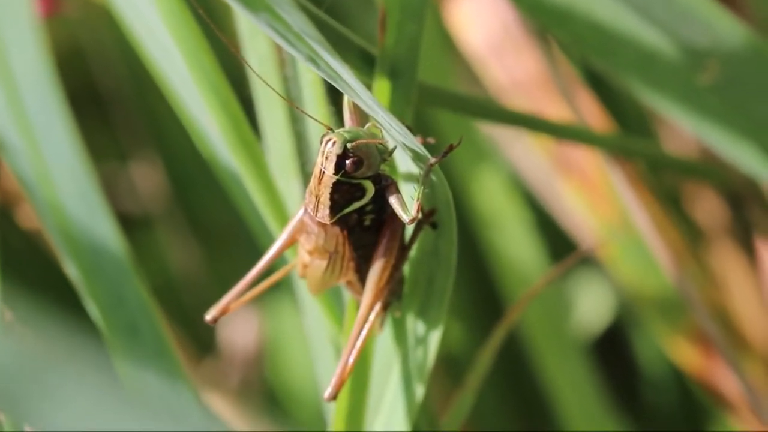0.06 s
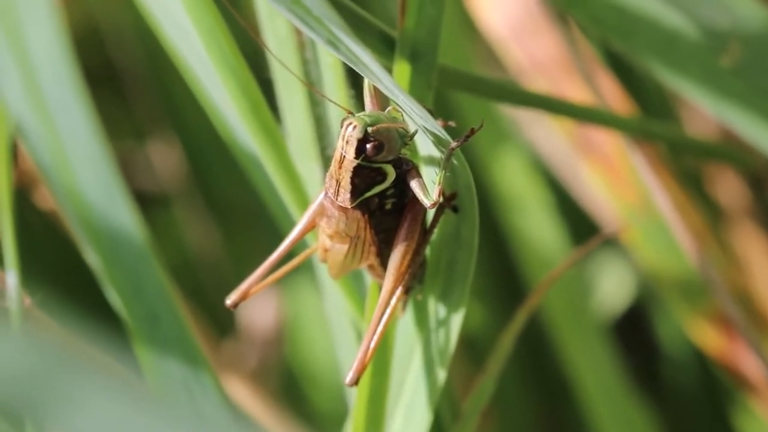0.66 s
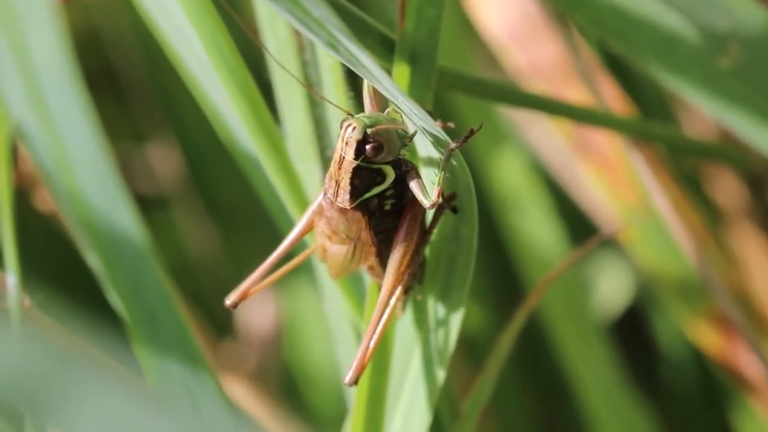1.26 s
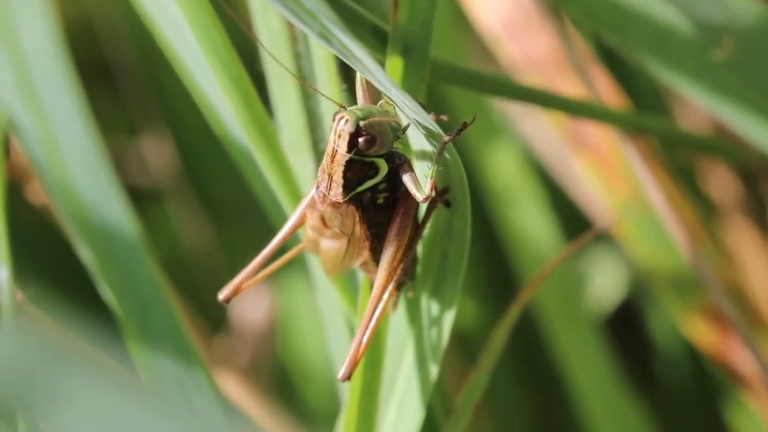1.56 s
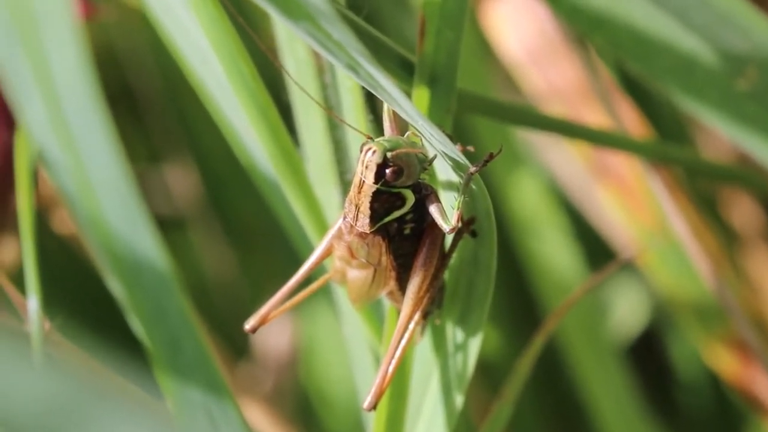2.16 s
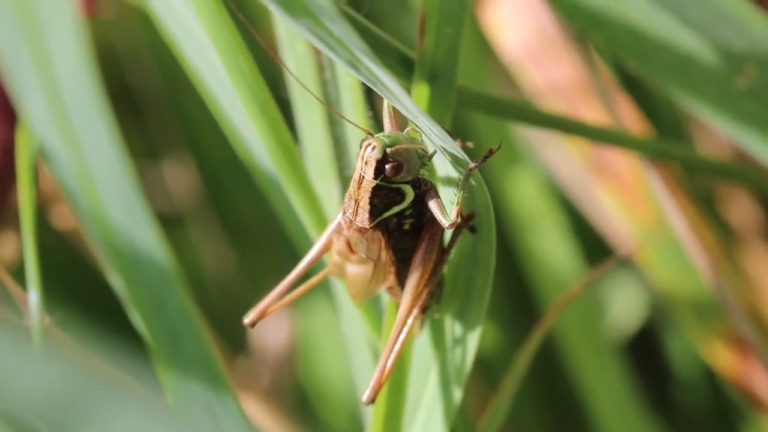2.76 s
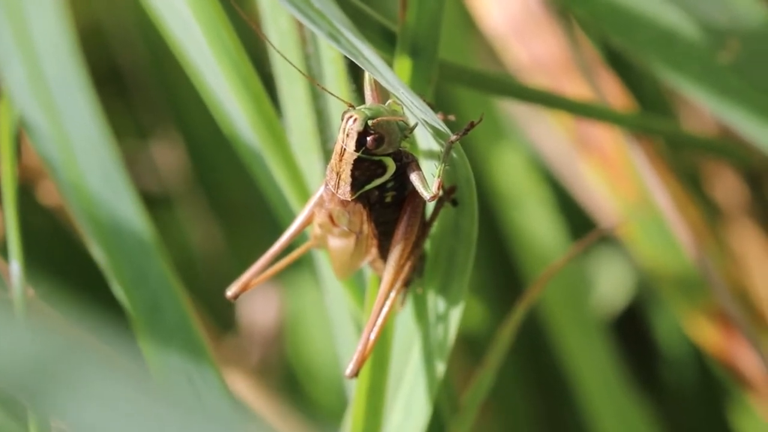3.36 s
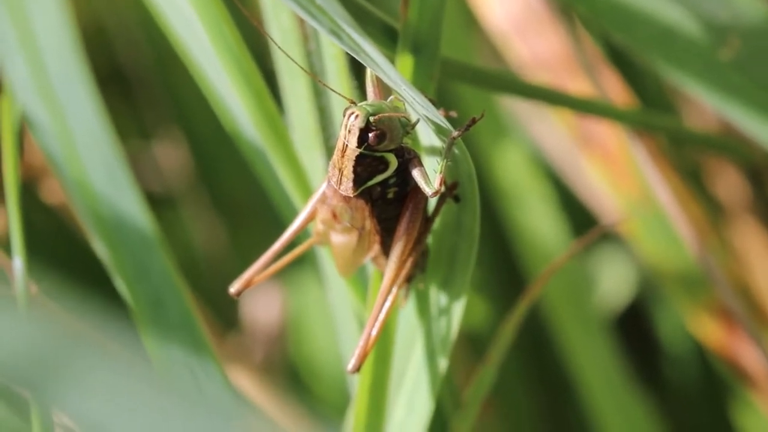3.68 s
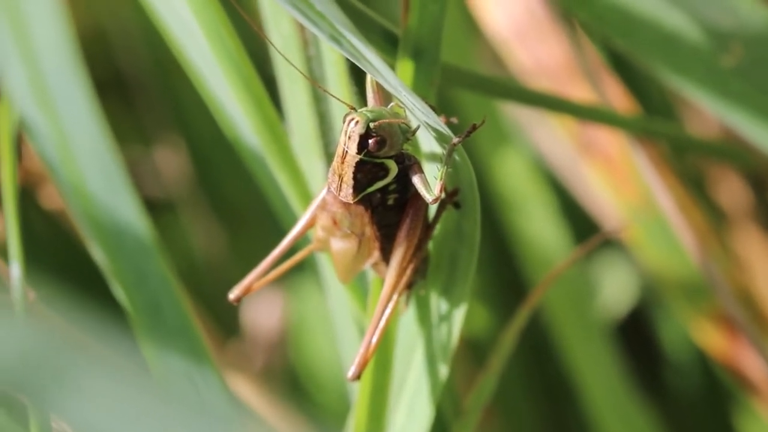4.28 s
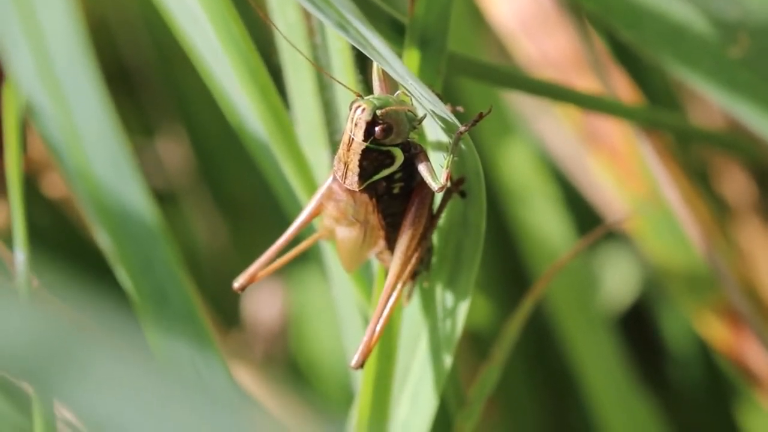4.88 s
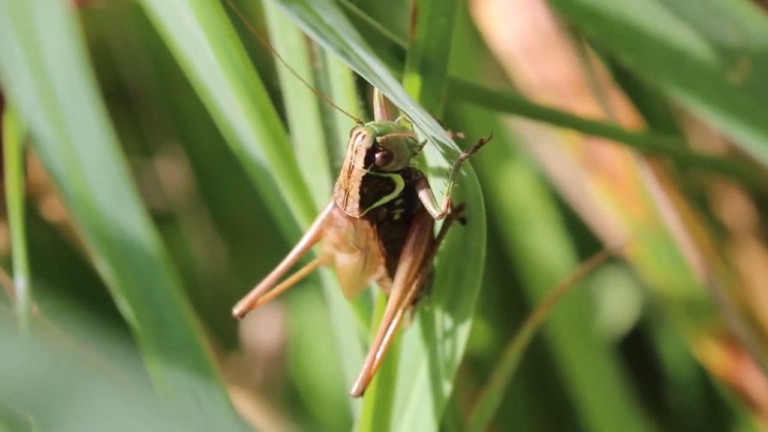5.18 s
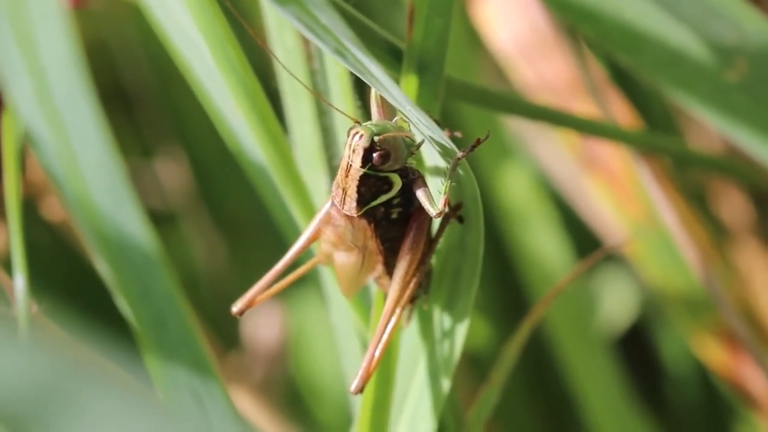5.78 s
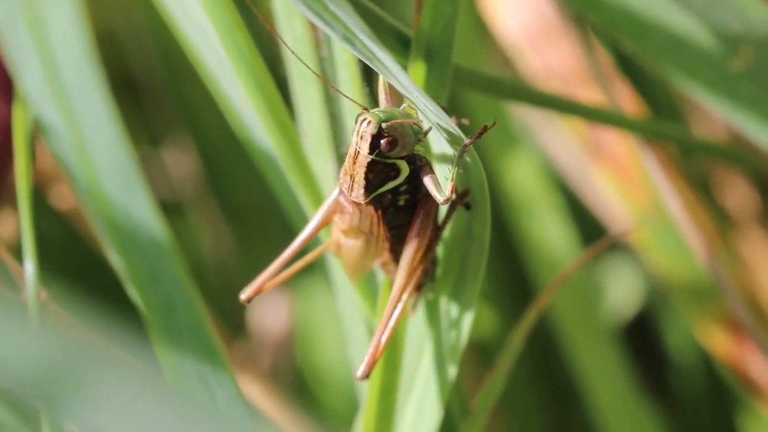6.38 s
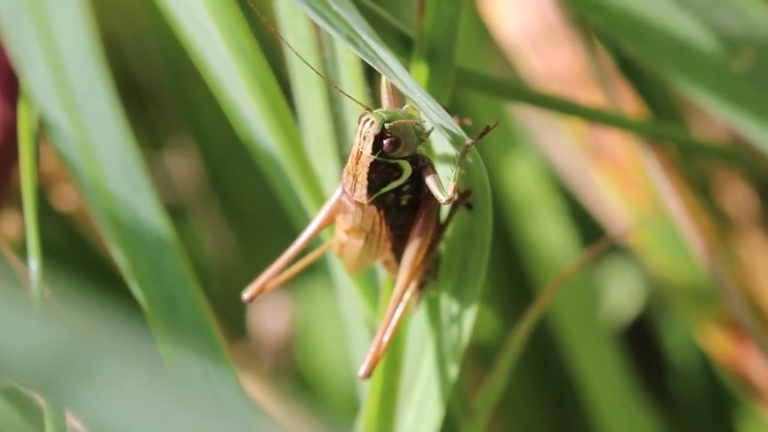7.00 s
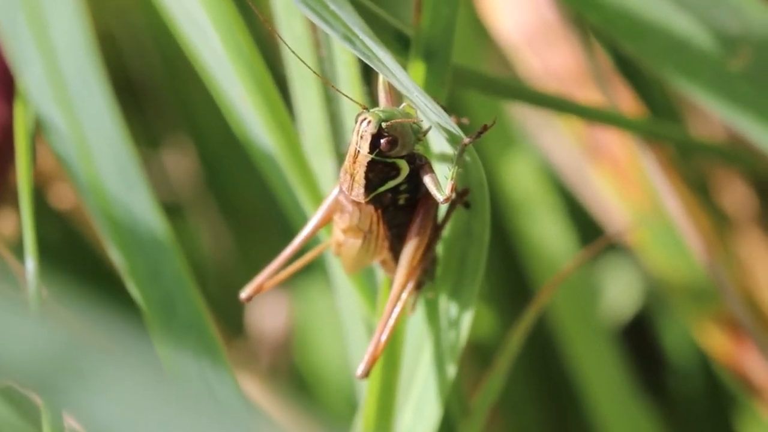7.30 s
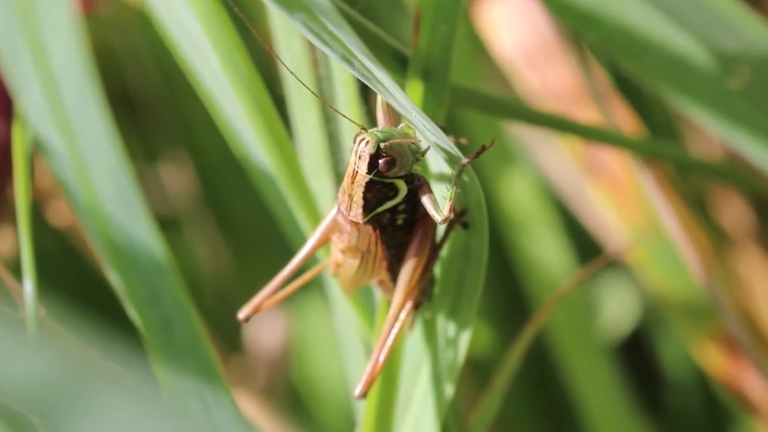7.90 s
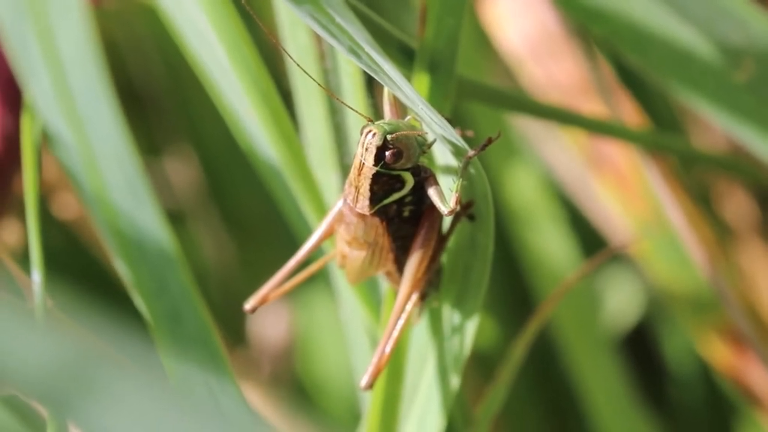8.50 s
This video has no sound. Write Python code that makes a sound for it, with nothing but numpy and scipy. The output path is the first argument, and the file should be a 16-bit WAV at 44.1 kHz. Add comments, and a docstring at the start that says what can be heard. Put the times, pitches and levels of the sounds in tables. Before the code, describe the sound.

A bush cricket buzzes continuously with a high, hissing trill, over faint wind, distant bird chirps and a far engine drone.

```python
"""In a meadow, a bush cricket sings without pause on a grass blade, close by and to the right.
Its wings close about ninety times a second. Each closing drags a row of tiny teeth (the file)
over a scraper, and the wing rings near 15 kHz. The grass scatters the song into a hiss.
Farther off are light wind, a droning engine, chirping birds and a twittering flock.
Twice, dry blades of grass touch with a faint tick."""
import sys
import numpy as np
from scipy import signal
from scipy.fft import rfft, irfft, next_fast_len
from scipy.io import wavfile
from scipy.ndimage import uniform_filter1d, map_coordinates

SR = 44100
rng = np.random.default_rng(int(sys.argv[2]) if len(sys.argv) > 2 else 0)


def output_pcm(signal):
    """Save a mono or channel-first signal as 16-bit PCM at the path in sys.argv[1].

    Samples are clipped to [-1, 1] before scaling.
    """
    pcm = np.clip(np.atleast_2d(signal).T, -1, 1) * 32767
    wavfile.write(sys.argv[1], SR, np.round(pcm).astype(np.int16))


N = 381465
TIME = np.arange(N) / SR

# Levels in the tables are relative: each sound's function sets how loud it ends up.
# the pace of the wings, sinking slightly: time_s, strokes_per_s
WING_PACE = [(0, 90.52), (.3, 90.99), (.6, 90.72), (1.7, 90.61), (2.3, 90.3), (2.6, 90.66), (3, 90.3),
             (3.6, 90.55), (4.2, 90.34), (4.8, 90.23), (5.3, 89.99), (6.2, 90.05), (7.1, 89.95),
             (7.5, 89.84), (8.65, 89.79)]
# how hard the cricket sings: time_s, effort_db
SONG_EFFORT = [(0.0, -29), (0.19, -27), (0.21, -31), (0.24, -29.5), (0.72, -28.5), (0.84, -31),
               (0.86, -28.5), (0.94, -29), (1.06, -27), (1.56, -28), (1.64, -28), (2.55, -29), (3.68, -29),
               (3.73, -29), (3.9, -27), (3.93, -28), (4.04, -29.5), (4.12, -29.5), (4.19, -27), (4.36, -30),
               (4.41, -27), (4.46, -29), (5.2, -27.5), (5.25, -30), (7.47, -29), (7.88, -28), (8.09, -31),
               (8.12, -28.5), (8.53, -28.5), (8.63, -25.5), (8.65, -28)]
# a long, a short and a slipped stroke: delay_ms, attack_ms, hold_ms, release_ms, tooth_hz, level_db
STROKE_KINDS = [(-.76, .3, .54, .68, 15340, 0), (-.5, .44, .26, .45, 14800, .5),
                (.95, .35, .2, .4, 14250, -4)]
# moments when the file slips and barely catches: time_s
SLIP_TIMES = [.203, .224, .818, 2.431, 3.238, 3.371, 6.986, 7.142, 7.153, 8.055]
# light scrapes as the wings open, and faint repeats shortly after each stroke, as if thrown back by nearby
# leaves: time_from_bite_ms, half_length_ms, level_db
STROKE_LUMPS = [(-3.5, .25, -25), (-1.5, .17, -16.5), (-1, .16, -16), (1.65, .25, -22), (2.5, 0.47, -26)]
# how well the thin wing gives off each pitch: pitch_hz, gain_db
WING_TONE = [(2000, -42), (5000, -24), (7000, -18), (8500, -8.5), (9200, -12), (9700, 1.5), (10400, 0.5),
             (12150, 6), (12550, 1), (13050, 9.5), (13850, 5), (14300, 0.5), (15450, 2.5), (15900, 4)]
# how much the left side is shaded from the cricket: pitch_hz, gain_db
LEFT_SHADE = [(5000, -2), (8500, -5), (10000, -9), (12000, -12), (13400, -15.5), (14200, -14),
              (14800, -12.5), (15300, -14.5)]
# the song as it comes back from the grass, left and right: pitch_hz, level_db
GRASS_TONE_LEFT = [(3000, -64), (5500, -56), (7000, -17.5), (8200, -14.5), (8550, -2.5), (9000, -19),
                   (9800, -6), (10400, -7.5), (12400, -11), (14000, -16), (14600, -6), (15400, -9),
                   (16000, -4.5)]
GRASS_TONE_RIGHT = [(3000, -55), (5500, -35), (7000, -20.5), (8500, -13), (9200, -5.5), (9750, -2.5),
                    (10500, -5.5), (12100, 0.5), (12600, -13), (13100, 5.5), (13800, -1), (15300, 5.5),
                    (16000, -16)]
# the top of the hiss flares up on the left: middle_s, half_length_s, level_db
HISS_FLARES = [(0.142, .07, -8), (6.35, 0.042, -4)]
# the hiss swells or sinks briefly: middle_s, lift_db
HISS_SWELLS = [(.14, 2), (.45, -1), (1.6, 0.5), (1.92, -4), (2.55, 1.5), (2.76, 2.8), (4.5, 2.2),
               (5.02, 1.5), (5.32, 2.5), (5.9, -2.5), (6.15, -3), (6.7, 1.5), (6.87, 1.5), (7.15, 2),
               (7.8, -1.5), (8.35, -1.5), (8.56, 2)]
# the tone of the open air: pitch_hz, level_db
WIND_TONE = [(20, -15), (35, -4), (58, 1), (85, 0), (125, -5.5), (250, -8), (450, -11), (700, -15),
             (1100, -16), (2000, -22), (3000, -20.5), (4000, -19.5), (5000, -24.5), (9000, -20)]
# gusts of the breeze: middle_s, half_length_s, lift_db
WIND_GUSTS = [(1.15, 0.4, 0.7), (2, 0.42, 1), (2.755, 0.053, 2.5), (4.2, 0.88, 0.86), (6.95, 0.32, 1.5),
              (8.4, 0.86, 0.8)]
# the tones that make up the drone: multiple_of_cycle_rate, level_db
ENGINE_HARMONICS = [(4, 2), (6, 1), (7, -18), (8, 4.5), (9, 0.5), (10, 6.5), (11, -5.5), (12, .5), (13, -2),
                    (14, -4), (15, -10.5), (16, -4.5), (18, -5), (20, -6)]
# the air carries one band of the drone: middle_s, half_length_s, pitch_hz, lift_db
ENGINE_SWELLS = [(1.6, 0.45, 269, 7), (2.65, 0.95, 278, 5.5), (2.75, 0.31, 240, 3), (2.85, 0.94, 188, 8),
                 (4.4, 0.92, 247, 3), (4.9, 1.05, 201, 8), (5.9, 0.83, 392, 10.5), (6.5, 1.1, 167, 12),
                 (6.955, 0.5, 416, 16), (7.297, .36, 322, 17), (7.498, 0.25, 250.5, 14),
                 (8.264, 0.48, 258, 14)]
# the nearest bird's rising chirps: start_s, length_s, from_hz, to_hz, level_db
BIRD_CHIRPS = [(.432, 0.049, 2430, 3000, -62), (1.148, 0.052, 2400, 3000, -56),
               (1.746, 0.053, 2316, 3020, -53.5), (2.461, 0.053, 2640, 3100, -63),
               (3.332, 0.061, 2260, 3000, -56.5), (3.897, 0.048, 2460, 3030, -56),
               (4.055, 0.042, 2280, 2830, -62), (4.533, 0.053, 2500, 3050, -54),
               (5.155, .05, 2490, 2990, -62), (5.586, .05, 2400, 3000, -60), (7.045, 0.03, 2890, 3350, -54),
               (7.499, 0.062, 2610, 3120, -64), (8.401, .05, 2250, 2970, -59)]
# clearer whistles of other birds: start_s, length_s, from_hz, to_hz, level_db
BIRD_WHISTLES = [(3.74, 0.042, 2720, 2680, -62), (3.8, 0.044, 2680, 2710, -57.5),
                 (3.975, 0.037, 2380, 2330, -57.5), (4.245, .035, 2700, 2710, -67.5),
                 (4.95, 0.046, 3830, 3760, -63), (5.044, .055, 3420, 2700, -63),
                 (6.755, 0.055, 3080, 3130, -63), (6.78, .03, 3350, 3480, -60),
                 (6.87, .06, 3000, 3280, -60.5)]
# bouts of twitter from the far flock: start_s, length_s, middle_hz, level_db
FLOCK_BOUTS = [(1.936, 0.3, 3420, -62.5), (2.458, 0.091, 3750, -62.5), (5.171, 0.23, 3550, -62),
               (5.6, 0.13, 3000, -62), (6.202, 0.32, 3260, -60.5), (6.722, 0.33, 3200, -63.5),
               (7.042, .28, 3346, -57.5), (7.348, 0.23, 2950, -62.5), (8.306, 0.17, 3500, -66)]
# dry ticks in the grass: start_s, level_db
GRASS_TICKS = [(5.618, -47), (7.695, -49)]


def undb(db):
    """Turn decibels into a number to multiply by."""
    return 10 ** (np.asarray(db) / 20)


def unit(x):
    """Scale a signal to an average strength (rms) of one."""
    return x / np.sqrt(np.mean(x ** 2))


def bell(x, centre, half_width):
    """A smooth hump of height one."""
    return np.exp(-((x - centre) / half_width) ** 2)


def curve(points):
    """Join rows of time_s, value with straight lines."""
    return np.interp(TIME, *np.transpose(points))


def wander(turns_per_s):
    """A smooth random drift, mostly between -1 and 1."""
    steps = rng.standard_normal(8192)
    return map_coordinates(steps, [TIME * turns_per_s], order=2, mode="mirror")


def gain_at(tone, hz):
    """Look up the gain at each pitch in rows of pitch_hz, level_db."""
    pitches, db = np.transpose(tone)
    return undb(np.interp(np.log(hz + 1), np.log(pitches), db))


def shape(x, gain):
    """Filter a signal: multiply each pitch in it by gain(hz)."""
    size = next_fast_len(N + 4096)
    return irfft(rfft(x, size) * gain(np.fft.rfftfreq(size, 1 / SR)), size)[..., :N]


def colour(x, tone):
    """Filter a signal by rows of pitch_hz, level_db."""
    return shape(x, lambda f: gain_at(tone, f))


def noise_band(hz, width_hz, channels=1):
    """Noise around one pitch, unrelated in each channel."""
    noise = rng.standard_normal((channels, N))
    return unit(shape(noise, lambda f: np.exp(-2 * ((f - hz) / width_hz) ** 2)))


def stroke_force(ms, attack_ms, hold_ms, release_ms, brush_db=-25, brush_half_ms=3.2):
    """The file bites at ms = 0, holds and lets go; light scrapes lead in, faint repeats follow as from nearby
    leaves, and a light brush surrounds it."""
    bite = np.sin(np.pi / 2 * np.clip(ms / attack_ms, 0, 1)) ** 2
    release = np.exp(-(np.maximum(ms - attack_ms - hold_ms, 0) / release_ms) ** 1.5)
    scrapes = sum(undb(db) * bell(ms, at, half_ms) for at, half_ms, db in STROKE_LUMPS)
    return bite * release + scrapes + undb(brush_db) * bell(ms, 0, brush_half_ms)


def wings(first_stroke_s=.00265, jitter_ms=.17, detune_hz=35, waver_hz=130, rasp_db=-12.5):
    """Each stroke plucks the wing tooth by tooth: by chance long and high, or short and lower."""
    pace, effort_db = curve(WING_PACE), curve(SONG_EFFORT)
    cycle = np.cumsum(pace) / SR - first_stroke_s * pace[0]
    stroke = np.round(cycle).astype(int)  # which stroke each sample belongs to
    late, luck, hard, sharp, grit_db = rng.standard_normal((1024, 5)).T  # one draw per stroke
    effort = np.interp(np.arange(len(luck)), cycle, effort_db - effort_db.mean())
    luck = luck - .25 * np.roll(luck, 1)  # a long stroke makes a short one likelier next
    long, short, slipped = range(3)
    kind = np.where(luck + .7 * effort > .05, long, short)  # effort favours long strokes
    kind[stroke[np.searchsorted(TIME, SLIP_TIMES)]] = slipped
    delay_ms, attack_ms, hold_ms, release_ms, tooth_hz, db = np.array(STROKE_KINDS)[kind[stroke]].T
    ms_from_bite = (cycle - stroke) / pace * 1000 - delay_ms - jitter_ms * late[stroke]
    force = stroke_force(ms_from_bite, attack_ms, hold_ms, release_ms)
    tooth_hz = tooth_hz * np.maximum(force, .02) ** .018  # teeth pass faster under more force
    tooth_hz = tooth_hz + detune_hz * sharp[stroke] + waver_hz * noise_band(0, 2920)[0]
    force = force * undb(db + (.3 * hard + .26 * effort)[stroke])  # effort also presses harder
    ring = force * np.sin(2 * np.pi * np.cumsum(tooth_hz) / SR)
    # uneven teeth add a broad rasp
    rasp = force ** .69 * undb(grit_db)[stroke] * rng.standard_normal(N)
    return unit(colour(unit(ring) + undb(rasp_db) * unit(rasp), WING_TONE))


def shaded_left(song, lag_s=9e-6, leaf_s=.001315, leaf_db=-8):
    """The song reaches the left side shaded and a little late, and a leaf throws it back there."""
    def gain(hz):
        lag = np.exp(-2j * np.pi * hz * lag_s)
        leaf_echo = undb(leaf_db) * np.exp(-2j * np.pi * hz * leaf_s)
        return gain_at(LEFT_SHADE, hz) * lag * (1 + leaf_echo)
    return shape(song, gain)


def grass_hiss(left_db=-12, right_db=-7.2, flutter_db=1.61, sway_db=.52):
    """Moving grass scatters the song into a fluttering hiss, made here from noise."""
    left = undb(left_db) * unit(colour(rng.standard_normal(N), GRASS_TONE_LEFT))
    flares = sum(undb(db) * bell(TIME, at, half_s) for at, half_s, db in HISS_FLARES)
    left = left + flares * noise_band(hz=15000, width_hz=900)[0]
    right = undb(right_db) * unit(colour(rng.standard_normal(N), GRASS_TONE_RIGHT))
    swell_db = sum(db * bell(TIME, at, half_width=.06) for at, db in HISS_SWELLS)
    return np.array([left, right]) * undb(swell_db + flutter_db * wander(55) + sway_db * wander(8))


def cricket(gain_db=-28.5, direct_db=5.4):
    """The song straight from the wings, louder on the right, plus its hiss from the grass."""
    direct = undb(direct_db) * wings()
    return undb(gain_db) * (np.array([shaded_left(direct), direct]) + grass_hiss())


def outdoor_noise(apart_hz=1040, least_side=.32):
    """Noise whose bass is much alike left and right, and whose treble is unrelated."""
    mid, side = rng.standard_normal((2, N))
    side = shape(side, lambda f: np.minimum(np.hypot(least_side, f / apart_hz), 1))
    return np.array([mid + side, mid - side])


def wind(rumble_db=-50.5, rustle_db=-51, split_hz=130, gust_db=1.6, sway_db=.55, flicker_db=1.7):
    """Light wind: an uneven rumble under a soft rustle. Apart from the wind, narrow bands of the treble flicker
    on their own."""
    noise = colour(outdoor_noise(), WIND_TONE)
    bass = shape(noise, lambda f: 1 / (1 + (f / split_hz) ** 4))
    breeze_db = sum(db * bell(TIME, at, half_s) for at, half_s, db in WIND_GUSTS)
    rumble = bass * undb(rumble_db + breeze_db + gust_db * wander(7.4))
    cells = signal.stft(noise - bass, nperseg=1024)[2]  # the rest, as a grid of pitch by time
    flicker = rng.standard_normal(cells.shape[1:])
    flicker = uniform_filter1d(flicker, size=5, axis=0)  # smooth across pitch
    flicker = unit(uniform_filter1d(flicker, size=4, axis=1))  # and across time
    treble = signal.istft(cells * undb(flicker_db * flicker))[1][:, :N]
    rustle = treble * undb(rustle_db + breeze_db + sway_db * wander(21))
    return (rumble + rustle) / np.std(noise)


def engine(cycle_hz=24.07, drift=.001404, gain_db=-71, fade_db_per_s=1.77, fade_from_s=2.93):
    """A far engine at steady speed; moving air favours now one band of its drone, now another."""
    waver_db, side_db, swell_octaves = 1.0, -4, .2
    level_db = gain_db - fade_db_per_s * np.abs(TIME - fade_from_s)  # quieter before and after
    swells = [(hz, db * bell(TIME, at, half_s)) for at, half_s, hz, db in ENGINE_SWELLS]
    cycle_phase = 2 * np.pi * np.cumsum(cycle_hz * (1 + drift * wander(3.04))) / SR
    mid = side = 0
    for multiple, db in ENGINE_HARMONICS:
        pitch_hz = multiple * cycle_hz
        lift_db = sum(lift * bell(np.log2(pitch_hz / hz), 0, swell_octaves) for hz, lift in swells)
        strength = np.sqrt(2) * undb(level_db + db + lift_db + waver_db * wander(1.874))
        phase = multiple * cycle_phase + .5 * wander(7)
        mid = mid + strength * np.sin(phase + rng.uniform(0, 2 * np.pi))
        # adding TIME to the phase moves each tone slowly between left and right
        side = side + strength * undb(side_db) * np.sin(phase + rng.uniform(0, 2 * np.pi) + TIME)
    return np.array([mid + side, mid - side])


def bird_notes(rows, hoarse_hz, glide_share=.6):
    """Each note glides, then levels off; its pitch trembles, most in mid-note, so it sounds hoarse."""
    calls = np.zeros(N)
    tremble_hz = hoarse_hz * noise_band(0, 700)[0]
    for start, length, from_hz, to_hz, db in rows:
        span = np.arange(*np.searchsorted(TIME, [start, start + length]))
        progress = (TIME[span] - start) / length
        arch = np.sqrt(np.abs(np.sin(np.pi * progress)))
        glide = np.sin(np.pi / 2 * np.minimum(progress / glide_share, 1)) ** 2
        hz = from_hz + (to_hz - from_hz) * glide + tremble_hz[span] * arch
        calls[span] += np.sqrt(2) * undb(db) * arch * np.sin(2 * np.pi * np.cumsum(hz) / SR)
    return calls


def meadow_echo(x, fade_s):
    """A blurred echo from the meadow's edge, unrelated left and right, falling 60 dB in fade_s."""
    tail = rng.standard_normal((2, SR // 2)) * undb(-60 * TIME[:SR // 2] / fade_s)
    return signal.fftconvolve(x[None], tail / np.linalg.norm(tail[0]))[:, :N]


def birds(direct_db=-.9, echo_db=-5):
    """Hoarse rising chirps and a few clearer whistles, with a faint echo."""
    calls = bird_notes(BIRD_CHIRPS, hoarse_hz=255) + bird_notes(BIRD_WHISTLES, hoarse_hz=85)
    return undb(direct_db) * calls + undb(echo_db) * meadow_echo(calls, fade_s=.21)


def flock(note_count=11, note_s=.05, spread_octaves=.14, glide_octaves=.13, direct_db=-7, echo_db=-1):
    """Far birds twitter: each bout is a scatter of short, faint notes, blurred by their echo."""
    rows = []
    for start, length, middle_hz, db in FLOCK_BOUTS:
        times = start + length * (np.arange(note_count) + rng.random(note_count)) / note_count
        note_db = db - 10 * np.log10(note_count * note_s / length)  # the notes share the bout's power
        for at, (pitch, glide) in zip(times, rng.standard_normal((note_count, 2))):
            hz = middle_hz * 2 ** (spread_octaves * pitch)
            rows.append((at, note_s, hz, hz * 2 ** (glide_octaves * glide), note_db))
    twitter = bird_notes(rows, hoarse_hz=330)
    return undb(direct_db) * twitter + undb(echo_db) * meadow_echo(twitter, fade_s=.1)


def grass_ticks(decay_s=.0041):
    """Dry blades touch: each tick is a tiny burst of noise that dies at once."""
    bursts = sum(undb(db) * (TIME >= at) * np.exp(-np.abs(TIME - at) / decay_s)
                 for at, db in GRASS_TICKS)
    return bursts * noise_band(hz=3950, width_hz=1300, channels=2)


def scene():
    """The cricket in front of its meadow."""
    return cricket() + wind() + engine() + birds() + flock() + grass_ticks()


def record(dry):
    """Cut off the very highest treble steeply."""
    top_hz, edge_hz = 15830, 150
    return shape(dry, lambda f: np.clip((top_hz - f) / edge_hz + .5, 0, 1))


dry = scene()
out = record(dry)
output_pcm(out)
```